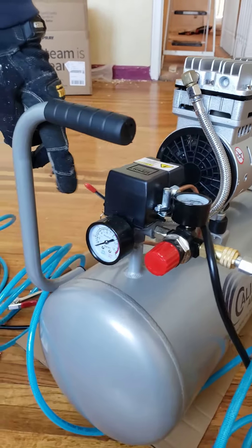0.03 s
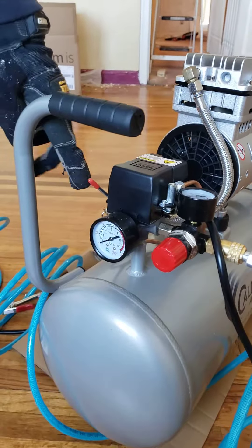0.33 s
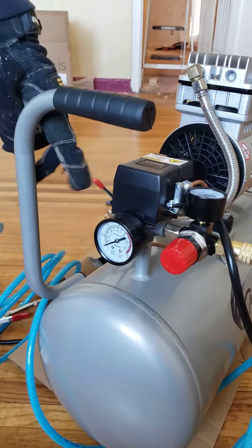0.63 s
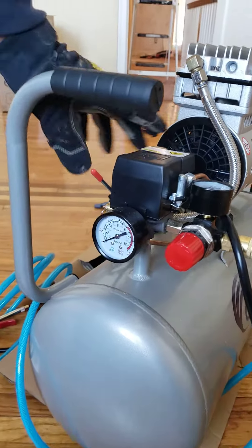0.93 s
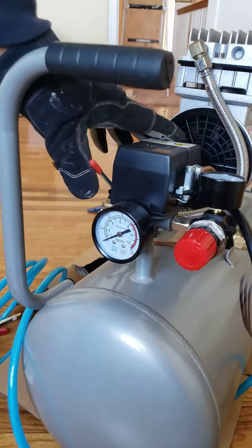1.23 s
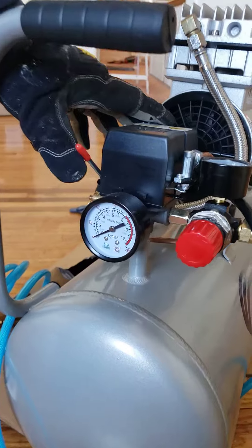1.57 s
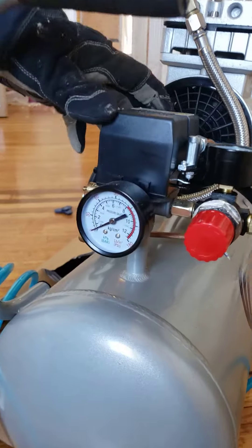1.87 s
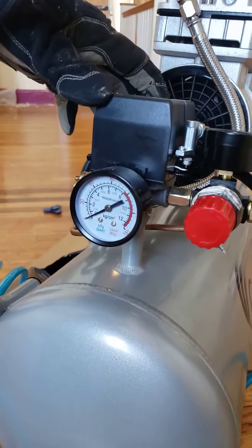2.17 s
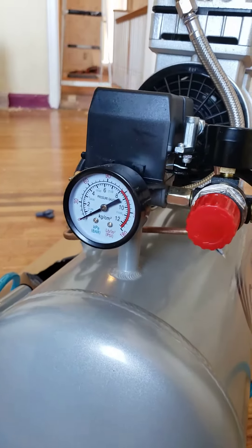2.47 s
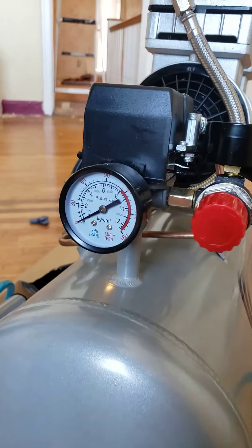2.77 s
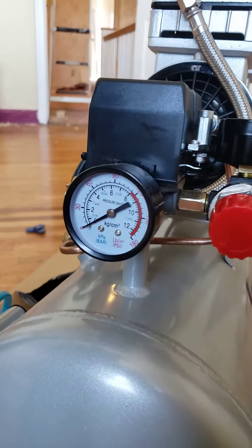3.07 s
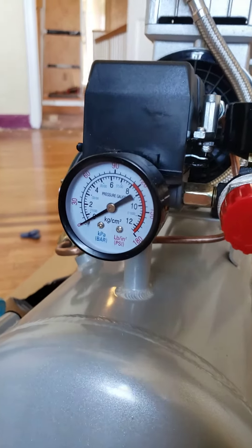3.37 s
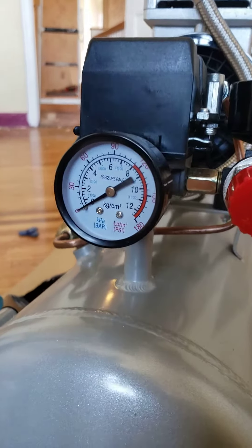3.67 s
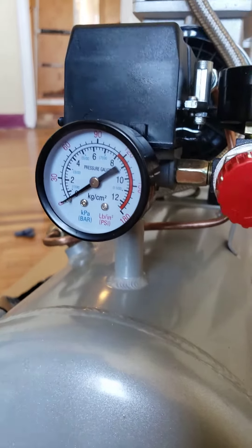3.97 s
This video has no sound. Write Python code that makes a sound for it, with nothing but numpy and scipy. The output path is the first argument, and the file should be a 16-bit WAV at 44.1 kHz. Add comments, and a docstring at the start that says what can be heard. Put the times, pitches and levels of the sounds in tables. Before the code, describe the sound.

An air compressor kicks on with a sharp snap and a short sputter of air after some soft glove bumps. It keeps running indoors, close to the microphone, as a loud rattling drone with fast pulsing hiss.

```python
"""A glove rustles and bumps on the pressure switch of a small two-piston air compressor, close up
on a wooden floor in a quiet room. The switch snaps, the motor jolts the tank and air spits until the
valves seat. Then the pump runs: valve clatter rings the cylinder heads and air hisses on every stroke,
over mains hum and shaft throb. Near the end the heads sing out briefly and a hand gives a dull knock."""
import sys
import numpy as np
from scipy import signal
from scipy.fft import rfft, irfft
from scipy.io import wavfile
from scipy.ndimage import uniform_filter1d, map_coordinates

SR = 44100
rng = np.random.default_rng(int(sys.argv[2]) if len(sys.argv) > 2 else 0)


def int16_out(signal):
    """Quantize to a 16-bit WAV file."""
    q = np.round(np.clip(np.atleast_2d(signal).T, -1, 1) * 32767)
    wavfile.write(sys.argv[1], SR, q.astype(np.int16))


N = 176400
T = np.arange(N) / SR
FREQS = np.maximum(np.arange(N // 2 + 1) * SR / N, 1)
LEVER_S, START_S = 1.67, 1.733
SHAFT_HZ, MAINS_HZ = 28.62, 60
SPIN_UP_S, LOAD_RISE_S, RING_RISE_S = .05, .095, .11
CLICK_DECAY_S = .0024

# EQ of the valve clatter: f/Hz, level/dB
CLATTER_EQ = [(38, -30), (55, 0.5), (300, -10.5), (520, -6), (720, -9), (1000, 0.5), (1400, -14),
              (1850, -6.5), (2700, -7), (3200, -0.5), (4000, 2.5), (4500, -3), (5300, -4), (6200, -8),
              (7200, -5.5), (9300, -14.5), (16000, -11)]
# stereo lean of the clatter: f/Hz, left over right/dB
CLATTER_PAN = [(60, 8), (400, 2), (1300, 8.5), (2400, -4), (4000, 0.5), (8000, -2)]
# resonances of heads, shroud and tank: f/Hz, width/Hz, relative level/dB, left over right/dB
METAL_MODES = [(420, 29, 1, 15.5), (826, 36.5, 8, 4), (885, 39, 8, 0), (1271, 47, 6, 4.5),
               (1471, 22, 4.5, -4), (1687, 25, 8.5, 5), (2402, 12, 8.5, 4), (2705, 11.6, 8, -3.5),
               (2855, 8.5, 13, 1), (3043, 72, 9.5, -4), (3330, 25, 12, -12), (3489, 35, 14.5, -7.5),
               (4142, 35, 17, -1.5), (4880, 55, 8, -11.5), (5652, 34, 11.5, 5)]
# EQ of the valve hiss: f/Hz, level/dB
HISS_EQ = [(3000, -19), (6000, -2), (9000, -15), (11500, 1), (13000, 7.5), (14000, 3.5), (15200, 10.5),
           (16000, 1)]
# fader ride for the nearness of the pump: t/s, gain/dB
NEARNESS = [(2, 2), (2.9, 1.66), (3.5, 3)]
# even tones of the pump: f/Hz, relative level/dB
DRONE_TONES = [(422, -57.5), (1262, -56)]
# moments when a head mode sings out: t/s, length/s, f/Hz, level/dB
HEAD_NOTES = [(3.293, 0.023, 3345, -34), (3.29, .65, 3508, -41), (3.413, 0.23, 4140, -37.5)]
# shaft throb: multiple of the shaft rate, level/dB
THROB_PARTIALS = [(2, -57), (3, -62.5), (4, -67.5), (5, -63.5)]
# magnetic hum and rotor-slot whine: multiple of twice the mains, added shaft multiple, running level/dB
HUM_PARTIALS = [(1, 0, -46.5), (1, 1, -59), (0, 25, -61), (-1, 33, -55), (1, 27, -55)]
# EQ of lever scrape, switch snap and motor kick: f/Hz, level/dB
JOLT_EQ = [(35, -34), (70, 1), (130, -4), (280, -16.5), (560, 0), (1200, -9.5), (1900, -13), (3200, -3.5),
           (4300, -4), (5500, -8.5), (7000, -1.5), (8500, -13.5), (13000, -4), (16000, -7)]
# modes of tank and heads rung by the jolt: f/Hz, level/dB, t60/s
TANK_MODES = [(135.2, -34, .22), (612, -37, 0.72), (195, -33, 0.15), (3100, -36, 0.3), (3550, -30.5, 0.32),
              (6810, -44, 0.43)]
# spits of air before the valves seat: t/s, length/s, level/dB
AIR_SPITS = [(1.832, 0.048, -23), (1.881, 0.039, -22.5), (1.923, 0.034, -21), (1.978, 0.0058, -28)]
# EQ of the spitting air: f/Hz, level/dB
SPIT_EQ = [(1000, -5), (3500, -35), (6500, 0), (10800, -6.5), (13300, 1.5), (15300, 10), (16000, -1.5)]
# clacks of the valves as they seat: t/s, level/dB
VALVE_CLACKS = [(1.889, -29), (1.925, -40), (1.941, -22), (1.994, -16.5), (2.026, -22)]
# modes of the lever's spring: f/Hz, level/dB
SPRING_MODES = [(1550, -69), (2600, -70)]
# EQ of the hand's knock: f/Hz, level/dB
KNOCK_EQ = [(60, -22), (150, -6.5), (300, -10), (1500, -30)]
# soft bumps of the glove: t/s, level/dB
GLOVE_BUMPS = [(1.074, -38), (1.105, -38.5), (1.185, -37)]
# dull modes of each bump: f/Hz, relative level/dB, decay/s
BUMP_MODES = [(110, 1.5, 0.0075), (257, -6, 0.0052)]
# glove and sleeve rubbing: t/s, width/s, level/dB
CLOTH_RUBS = [(.27, 0.05, -62), (.39, 0.093, -58.5), (.435, 0.027, -56), (.95, 0.1, -65.5)]
# EQ of the rubbing: f/Hz, level/dB
RUB_EQ = [(30, -8), (60, 9.5), (130, 3.5), (1500, -33.5), (7000, -30), (9000, -35), (16000, -25)]
# small ticks of the glove: t/s, level/dB
GLOVE_TICKS = [(.391, -54), (1.004, -58)]
# faint, airy swishes of fabric: t/s, width/s, level/dB
CLOTH_SWISHES = [(.45, 0.2, -64.5), (.73, 0.17, -62), (1.13, 0.13, -67.5)]
# EQ of the swishes: f/Hz, level/dB
SWISH_EQ = [(3000, -21), (7200, 2), (8500, -11), (10500, 2)]
# EQ of the room tone: f/Hz, level/dB
ROOM_EQ = [(25, -25), (55, 5), (130, -4), (500, -25.5), (5500, -40), (7200, -27), (8500, -44.5),
           (13000, -32.5)]


def pump(turns):
    """The lead layer: clatter, ring and hiss pulse with the pistons over an even drone."""
    surging = strokes(turns, depth=.066) * flutter(60, db=.8)
    valves = clatter(turns, surging) + metal_ring(turns, surging) + hiss(turns)
    nearness = undb(np.interp(T, *np.array(NEARNESS).T))
    return valves * nearness + drone()


def strokes(turns, depth, second_piston=.62):
    """Two pistons give two unequal surges of air in each turn."""
    surge = lambda offset: np.cos(np.pi * (turns + offset)) ** 16
    return unit(1 + 2 * depth * (surge(0) + second_piston * surge(.67)))


def valve_noise(turns, repeat_share=.26):
    """Valve rattle: part loops with every turn, part is always new."""
    place_in_turn = (turns % 1 * SR / SHAFT_HZ).astype(int)
    looped = noise(likeness=.38)[:, place_in_turn]
    fresh = noise(likeness=.38)
    return scatter(np.sqrt(repeat_share) * looped + np.sqrt(1 - repeat_share) * fresh)


def clatter(turns, surging):
    """The broad body of the valve rattle, fading in as the pump takes load."""
    rattle = scatter(valve_noise(turns)) * surging
    body = undb(over_hz(CLATTER_EQ)) * pan(over_hz(CLATTER_PAN))
    return undb(-34) * unit(filtered(rattle, body)) * rise(LOAD_RISE_S)


def metal_ring(turns, surging, flat_share=.014, settle_s=.8):
    """The valves ring heads, shroud and tank; the ring starts flat and creeps up to pitch."""
    power = sum((undb(db) * pan(pan_db) / (1 + 2 * ((FREQS - hz) / width) ** 2)) ** 2
                for hz, width, db, pan_db in METAL_MODES)
    rattle = valve_noise(turns, repeat_share=.082) * surging
    ring = unit(filtered(rattle, np.sqrt(power)))
    lead_s = flat_share * settle_s * (1 - rise(settle_s))  # a shrinking lead bends the pitch flat
    bent = np.array([map_coordinates(side, [(T + lead_s) * SR], mode="mirror") for side in ring])
    return undb(-35) * bent * rise(RING_RISE_S)


def hiss(turns):
    """Bright air rushes through the valves on every stroke."""
    air = colour(scatter(valve_noise(T * SHAFT_HZ)), HISS_EQ)
    return undb(-33) * air * strokes(turns, depth=.44) * rise(LOAD_RISE_S)


def drone():
    """The pump's even, slightly trembling tones, to the left."""
    tones = sum(undb(db) * wavering(hz, waver_hz=7.87) for hz, db in DRONE_TONES)
    return 2 * tones * pan(6.5) * rise(RING_RISE_S)


def singing_heads():
    """Modes of the cylinder head sing out for a moment, wavering, to the right."""
    return sum(undb(db) * wavering(hz, waver_hz=13.8) * envelope(s, .012, length, .032)
               for s, length, hz, db in HEAD_NOTES) * pan(-10.5)


def motor(turns, inrush_db=8, inrush_s=.14):
    """Shaft throb under a magnetic hum that is stronger while the starting current flows."""
    throb = sum(undb(db) * tone(round(k) * turns) for k, db in THROB_PARTIALS)
    hum = sum(undb(db) * tone(round(k) * 2 * MAINS_HZ * T + round(m) * turns)
              for k, m, db in HUM_PARTIALS)
    inrush = undb(inrush_db * (1 - rise(inrush_s)))
    return np.sqrt(2) * (throb * rise(SPIN_UP_S) + hum * rise(.012) * inrush) * pan(2.5)


def switch_on(split_hz=4500, kick_attack_s=.0093, hold_s=.014):
    """The contacts snap; the motor's kick follows lower down and rings the tank."""
    crash = colour(noise(), JOLT_EQ)
    low = filtered(crash, 1 / (1 + (FREQS / split_hz) ** 4))
    snap = (crash - low) * envelope(START_S, .0016, hold_s, .03)
    kick = low * envelope(START_S, kick_attack_s, hold_s, .062)
    tank = sum(undb(db) * tone(hz * T) * envelope(START_S, kick_attack_s, hold_s, t60 / np.log(1000))
               for hz, db, t60 in TANK_MODES)
    return undb(-15.5) * (snap + kick) * flutter(300, db=1.1) + tank * pan(4.3)


def valves_seating():
    """Bright, sputtering air and sharp clacks until the valves seat."""
    flow = sum(undb(db) * envelope(s, .0016, length, .0053) for s, length, db in AIR_SPITS)
    clacks = sum(undb(db) * envelope(s, .00044, .0013, CLICK_DECAY_S) for s, db in VALVE_CLACKS)
    air = colour(scatter(noise()), SPIT_EQ)
    return air * flow * flutter(200, db=1.04) + noise() * clacks


def lever(toggle_lead_s=.006):
    """The lever scrapes and its spring pings, then it tips over just before the contacts meet."""
    push = undb(-68) * (T > LEVER_S)
    toggle = undb(-49) * (T > START_S - toggle_lead_s)
    scrape = colour(noise(), JOLT_EQ) * (push + toggle) * (T < START_S)
    spring = sum(undb(db) * sine(hz * T) for hz, db in SPRING_MODES)
    return scrape + spring * envelope(LEVER_S, .002, 0, .033)


def hand_knock(at_s=3.739):
    """A dull, rustling knock of the hand while the pump runs."""
    return undb(-35) * colour(noise(), KNOCK_EQ) * envelope(at_s, .0024, .026, .068)


def glove():
    """Glove and sleeve bump, rub and tick on the right, with a wide swish of fabric."""
    bumps = sum(undb(db + mode_db) * sine(hz * (T - s)) * envelope(s, .0032, .00092, decay)
                for s, db in GLOVE_BUMPS for hz, mode_db, decay in BUMP_MODES)
    scuffs = sum(undb(db - 16.5) * envelope(s, .00078, .0019, .016) for s, db in GLOVE_BUMPS)
    cloth = colour(noise(), RUB_EQ) * (swells(CLOTH_RUBS) * flutter(120, db=3.3) + scuffs)
    ticks = noise() * sum(undb(db) * envelope(s, .00031, 0, CLICK_DECAY_S) for s, db in GLOVE_TICKS)
    swish = colour(noise(), SWISH_EQ) * swells(CLOTH_SWISHES)
    return bumps * pan(-18) + (cloth + ticks) * pan(-17) + swish


def steel_handle(at_s=.36, hz=840):
    """The steel handle rings faintly as it is let go."""
    return undb(-76) * sine(hz * T) * envelope(at_s, .01, 0, .49)


def scatter(x, above_hz=900, step_hz=110, level_db=1.5, phase_rad=1.8):
    """Reflections off tank and floor give each side its own fine ripple in level and phase."""
    grid = np.arange(0, SR / 2, step_hz)
    highs = 1 / (1 + (above_hz / FREQS) ** 2)
    ripple = lambda: highs * np.array([np.interp(FREQS, grid, rng.standard_normal(len(grid))) for _ in x])
    return unit(filtered(x, undb(level_db * ripple()) * np.exp(1j * phase_rad * ripple())))


def room(x, t60_s=.42, predelay_s=.006, wet_db=-7.5):
    """Floor and walls add a short reverb tail."""
    tail = rng.standard_normal((2, SR)) * undb(-60 * T[:SR] / t60_s) * (T[:SR] > predelay_s)
    tail /= np.sqrt(np.sum(tail ** 2) / 2)
    return x + undb(wet_db) * signal.fftconvolve(x, tail, axes=1)[:, :N]


def room_tone():
    """The quiet room's bed of low rumble."""
    return undb(-62) * colour(noise(), ROOM_EQ) * pan(1.8)


def undb(db):
    """Decibels to gain."""
    return 10 ** (np.asarray(db) / 20)


def unit(x):
    """Scale to rms 1."""
    return x / np.sqrt(np.mean(x ** 2))


def pan(db):
    """Left and right gains; positive dB leans left."""
    return undb(np.array([[.5], [-.5]]) * db)


def over_hz(points):
    """Join (Hz, value) points on a log-frequency axis."""
    hz, value = np.array(points).T
    return np.interp(np.log(FREQS), np.log(hz), value)


def filtered(x, response):
    """Apply a gain at each frequency."""
    return irfft(rfft(x) * response, N)


def colour(x, eq):
    """Apply an EQ curve and scale to rms 1."""
    return unit(filtered(x, undb(over_hz(eq))))


def noise(likeness=.044, bass_hz=300):
    """Stereo white noise, nearly mono in the bass and wider above."""
    mid, side = rfft(rng.standard_normal((2, N)))
    alike = np.clip(likeness + (1 - likeness) / (1 + (FREQS / bass_hz) ** 2), 0, .97)
    spread = np.array([[1], [-1]]) * side * np.sqrt((1 - alike) / 2)
    return irfft(mid * np.sqrt((1 + alike) / 2) + spread, N)


def walk(rate_hz):
    """Smooth random modulation, rms 1."""
    step = int(SR / rate_hz)
    held = np.repeat(rng.standard_normal(N // step + 1), step)
    return unit(uniform_filter1d(held, step)[:N])


def flutter(rate_hz, db):
    """A gain that flickers at random."""
    return undb(db * walk(rate_hz))


def sine(cycles):
    """A sine from its phase in cycles."""
    return np.sin(2 * np.pi * cycles)


def tone(cycles):
    """A sine with a random starting phase."""
    return sine(cycles + rng.random())


def wavering(hz, waver_hz):
    """A tone of even strength, rms 1, whose pitch trembles."""
    return np.sqrt(2) * sine(np.cumsum(hz + waver_hz * walk(70)) / SR)


def envelope(start, attack, hold, decay):
    """Straight attack; exponential release from start + hold. All in seconds."""
    return np.clip((T - start) / attack, 0, 1) * np.exp(-np.maximum(T - start - hold, 0) / decay)


def swells(rows):
    """Bell-shaped fades from rows of t/s, width/s, level/dB."""
    return sum(undb(db) * np.exp(-((T - s) / width) ** 2) for s, width, db in rows)


def rise(lag_s):
    """Ease from 0 to 1 after the switch closes."""
    return 1 - np.exp(-np.maximum(T - START_S, 0) / lag_s)


def scene():
    """Handling, the start and the running pump over the room's low rumble."""
    shaft_hz = SHAFT_HZ * rise(SPIN_UP_S) * (1 + .0012 * walk(6))  # the speed wanders slightly
    turns = np.cumsum(shaft_hz) / SR
    start = room(lever() + switch_on()) + valves_seating()
    running = pump(turns) + motor(turns)
    foley = glove() + steel_handle() + hand_knock()
    return start + running + foley + singing_heads() + room_tone()


def record(dry, top_hz=15850):
    """A steep low-pass trims the very top."""
    return signal.sosfilt(signal.ellip(12, .2, 70, top_hz, fs=SR, output="sos"), dry)


dry = scene()
out = record(dry)
int16_out(out)
```